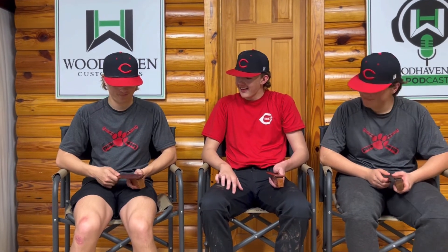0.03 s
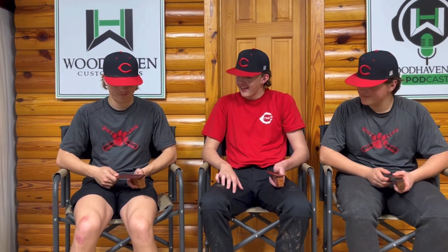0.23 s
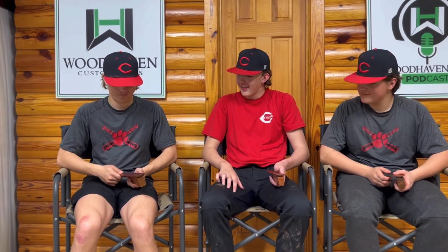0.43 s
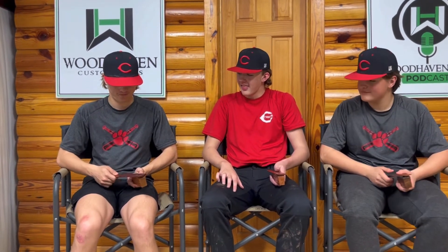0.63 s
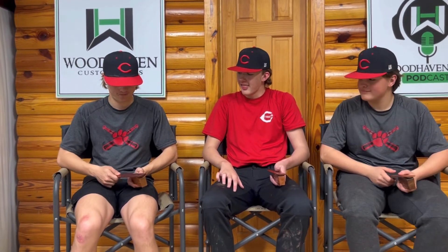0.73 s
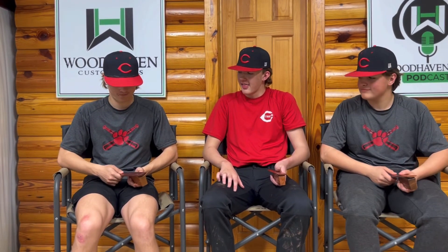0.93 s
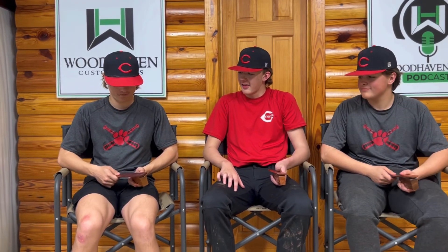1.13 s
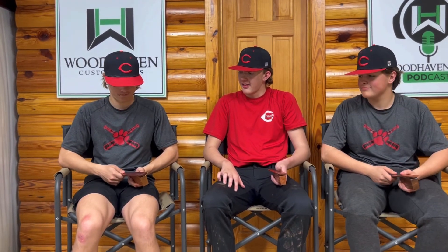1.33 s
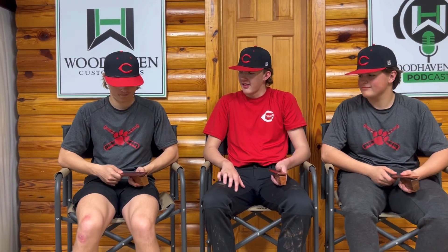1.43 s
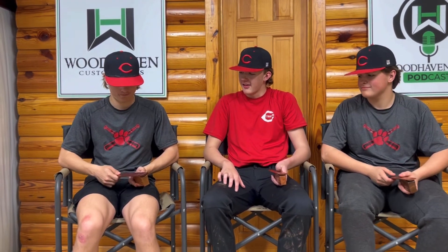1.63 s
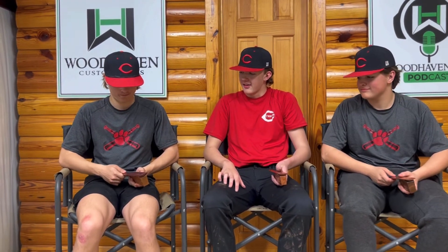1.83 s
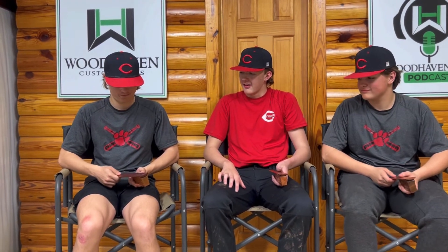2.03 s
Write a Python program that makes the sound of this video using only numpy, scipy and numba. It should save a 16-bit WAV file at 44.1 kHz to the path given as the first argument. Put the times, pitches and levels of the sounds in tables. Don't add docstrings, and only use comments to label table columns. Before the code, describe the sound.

Four nasal, squeaky turkey-like yelps scraped on a wooden box call, over a faint low hum

```python
import sys
import numpy as np
from scipy import signal
from scipy.fft import rfft, irfft, next_fast_len
from scipy.io import wavfile
from scipy.ndimage import uniform_filter1d
from numba import njit

SR = 44100
rng = np.random.default_rng(int(sys.argv[2]) if len(sys.argv) > 2 else 0)


def attenuation_scalar(level_db):
    decades = np.asarray(level_db, float) / 20
    return 10 ** decades


def int16_out(signal):
    q = np.round(np.clip(np.atleast_2d(signal).T, -1, 1) * 32767)
    wavfile.write(sys.argv[1], SR, q.astype(np.int16))


N = 92610

# t/s, twice the slip rate f/Hz, level/dB
STROKES = [
    [(.197, 1543, -37), (.213, 1475, -25), (.257, 1534, -22), (.291, 1551, -20), (.32, 1585, -20.5),
     (.345, 1601, -23), (.375, 1637, -34)],
    [(.637, 1397, -46.5), (.669, 1451, -27), (.697, 1478, -28), (.712, 1546, -25.5), (.75, 1580, -24),
     (.79, 1593, -22), (.82, 1588, -20), (.85, 1612, -25), (.875, 1637, -47.5)],
    [(1.172, 1573, -31), (1.19, 1514, -29), (1.23, 1573, -22), (1.262, 1608, -20), (1.29, 1650, -27),
     (1.315, 1650, -26), (1.335, 1692, -42.5)],
    [(1.597, 1451, -43.5), (1.612, 1433, -32.5), (1.645, 1406, -29), (1.66, 1501, -25), (1.68, 1545, -31.5),
     (1.697, 1580, -24.5), (1.75, 1593, -22.5), (1.79, 1615, -21.5), (1.835, 1650, -31.5)],
]
# t/s, twice the slip rate f/Hz, level/dB
EARLIER_STROKE = [
    (-.3, 1480, -10.5),
    (-.2, 1541, -28.5),
    (-.12, 1593, -25.5),
]
BREAK_TIMES = [
    -.15,
    .323,
    .826,
    1.268,
    1.756,
]
BREAK_STRENGTHS = [
    1.2,
    0.782,
    0.29,
    0.872,
    0.86,
]
# t/s, level over the slips/dB
TOUCHES = [
    (.2, -10),
    (0.659, -8.5),
    (1.175, 4),
    (1.61, -5),
]
# t/s, lowest-tone level/dB, treble tilt above the second overtone/(dB per kHz)
GRIP = [(0, 3, -0.48), (.2, -9.5, 0.05), (.35, 2, 0.07), (.65, 3, -0.77), (.72, 0, 0.2), (.82, 3.5, -0.67),
        (1.2, -0.5, -0.58), (1.3, 2, -0.27), (1.62, 5.5, -0.21), (1.75, 4, 0.24), (1.8, -1.5, -0.67)]
# f/Hz, spread/dB
OVERTONE_WANDER = [(800, 1.5), (1600, 1), (2400, 2), (4000, 5), (8000, 5), (12000, 5)]
# f/Hz, width/Hz, level/dB
BODY_TONES = [(728, 175, -20), (1212, 40, -34.5), (1480, 219, -1.5), (1580, 40.6, 5.5), (1650, 59.3, 0.5),
              (2117, 42, 7), (2347, 85.6, 2.5), (2636, 92.3, 7.5), (3400, 886, -9), (3903, 88, -3),
              (4540, 274, -9.5), (5350, 103, -9), (5890, 410, -13), (7040, 4800, -36.5), (10930, 670, -39),
              (15400, 2200, -47.5)]
# f/Hz, width/Hz
BODY_DIPS = [(1050, 160), (3500, 310)]
# f/Hz, left minus right level/dB
PORT_LEVELS = [(700, 0.5), (1300, 0), (2400, -9), (3300, 4), (4400, 11), (6500, 9), (9000, -0.5),
               (15000, -1)]
# f/Hz, left ahead of right/rad
PORT_PHASES = [(0, 1), (1550, 0.6), (2400, 4), (4000, 4), (5000, 3.5), (6000, 8.5), (8300, 6.5),
               (16000, 20)]
# f/Hz, fade time/s
ROOM_FADE = [(700, 0.13), (1100, 0.45), (1600, 0.33), (2000, 0.59), (2450, 0.34), (4000, 0.45), (7000, 0.6),
             (12000, 0.41)]
# f/Hz, level/dB per Hz
RUMBLE = [(30, -19), (45, -1.5), (69, -2), (113, -5.5), (167, -14.5), (230, -22.5), (450, -35.5),
          (1000, -41.5)]
# f/Hz, level/dB, wander/dB
HUM_TONES = [(93, -60, 1), (139.7, -57.5, 0.93)]
# t/s, level/dB
HUM_LEVEL = [
    (0, -0.5),
    (1.0, -4),
    (1.15, -12.5),
    (2.1, -5),
]
# f/Hz, level/dB
PHONE_TREBLE = [(7000, -0.5), (9400, -1), (11000, 0.5), (12700, -5.5), (14000, -4), (15500, -3.5)]
# f/Hz, share (0-1)
TREBLE_KEPT = [(9000, 1), (9500, .9), (9800, .03), (10500, .03), (11000, .8), (12600, .7), (13000, .06),
               (14400, .03), (14700, .3), (15700, .25)]

LEAD_S = .4
ATTACK_S, RELEASE_S, TOUCH_S = 0.0027, 0.0066, .004
RASP_RISE_S, RASP_FALL_S = 0.0038, 0.052
SMOOTH_JITTER, RASP_JITTER = .0045, .03
SMOOTH_SCATTER_DB, RASP_SCATTER_DB = .4, 2.5
SKIP_UP, SKIP_FALL_S = .14, .008
WOBBLE, RASP_WOBBLE = .004, .022
THROB_DB, THROB_RATE = 5, 110
SCRAPE_DB, RASP_SCRAPE_DB, SCRAPE_GRAIN_DB, SCRAPE_LOWCUT_HZ = -10.5, -33, 2.5, 1500
OVERTONE_HZ, OVERTONE_RATE = 770, 40
CALL_DB, KNOCK_DB, LOWCUT_HZ = 0.5, -32.5, 630
ROOM_DB, ROOM_START_S, ROOM_BUILD_S = -3, 0.0013, 0.0033
RUMBLE_DB, RUMBLE_SIDE_DB, HISS_DB = -59.5, -12, -88
TOP_HZ = 15750
PATCH_BINS, PATCH_FRAMES = 14, 3


def unit(x):
    return x / np.sqrt(np.mean(x ** 2))


def curve(at, table, col=1):
    table = np.array(table, float)
    return np.interp(at, table[:, 0], table[:, col])


def on_log(hz, table):
    table = np.array(table, float)
    return np.interp(np.log(hz + 1), np.log(table[:, 0] + 1), table[:, 1])


def walk(rate, size):
    k = int(SR / rate)
    steps = np.repeat(rng.standard_normal(size // k + 1), k)
    return 1.22 * uniform_filter1d(uniform_filter1d(steps, k), k)[:size]


def fade_after(t, start, fall_s):
    return np.exp(-np.maximum(t - start, 0) / fall_s)


def friction(t):
    hz, gain = np.full(len(t), 750.), np.zeros(len(t))
    for stroke in [EARLIER_STROKE] + list(STROKES):
        start, end = stroke[0][0], stroke[-1][0]
        near = (t > start - .01) & (t < end + .15)
        hz[near] = curve(t[near], stroke) / 2
        shape = np.clip((t - start) / ATTACK_S + .5, 0, 1) * fade_after(t, end, RELEASE_S)
        gain += shape * attenuation_scalar(curve(t, stroke, col=2))

    rasp, skip = 0, 0
    for at, strength in zip(BREAK_TIMES, BREAK_STRENGTHS):
        rise = np.clip((t - at) / RASP_RISE_S + 1, 0, 1)
        rasp = rasp + strength * rise * fade_after(t, at, RASP_FALL_S)
        skip = skip + strength * SKIP_UP * (t > at) * fade_after(t, at, SKIP_FALL_S)
    hz = hz * (1 + skip)
    hz = hz * (1 + (WOBBLE + RASP_WOBBLE * rasp) * walk(THROB_RATE, len(t)))
    throb = np.clip(walk(THROB_RATE, len(t)), -1.5, .6)
    gain = gain * attenuation_scalar((1 + THROB_DB * np.sqrt(rasp)) * throb)

    chance = np.clip(rng.standard_normal((len(t) // 40, 2)), -2.5, 2.5)
    jitter = SMOOTH_JITTER + RASP_JITTER * rasp
    scatter = np.log(attenuation_scalar(SMOOTH_SCATTER_DB + RASP_SCATTER_DB * rasp))
    clicks = slips(hz, jitter, scatter, chance)

    touch = sum(attenuation_scalar(db) * (t > at) * fade_after(t, at, TOUCH_S) for at, db in TOUCHES)
    scrape_gain = attenuation_scalar(SCRAPE_DB) + touch + rasp * attenuation_scalar(RASP_SCRAPE_DB)
    grain = attenuation_scalar(SCRAPE_GRAIN_DB * walk(150, len(t)))
    lowcut = signal.butter(1, SCRAPE_LOWCUT_HZ, "high", fs=SR, output="sos")
    scrape = scrape_gain * grain * signal.sosfilt(lowcut, rng.standard_normal(len(t)))
    return shifting_grip(unit(clicks) + scrape, t), gain


@njit
def slips(hz, jitter, scatter, chance):
    out, phase, k = np.zeros(len(hz) + 16), 0., 0
    for i in range(len(hz)):
        step = hz[i] * (1 + jitter[i] * chance[k, 0]) / SR
        phase += step
        if phase >= 1:
            phase, k = phase - 1, k + 1
            size = np.exp(scatter[i] * chance[k, 1])
            for j in range(16):
                d = j - 8 + phase / step
                out[i + j] += size * np.sinc(.9 * d) * (.5 + .5 * np.cos(np.pi * d / 8.5))
    return out[8:-8]


def shifting_grip(x, t):
    spectrum, hz = rfft(x), np.arange(len(x) // 2 + 1) * SR / len(x)
    out = 0
    for k in range(22):
        share = np.clip(1 - np.abs(hz / OVERTONE_HZ - k), 0, 1)
        db = on_log(k * OVERTONE_HZ, OVERTONE_WANDER) * walk(OVERTONE_RATE, len(x))
        db = db + (k < 2) * curve(t, GRIP)
        db = db + max(k - 2, 0) * OVERTONE_HZ / 1000 * curve(t, GRIP, col=2)
        out = out + attenuation_scalar(db) * irfft(spectrum * share, len(x))
    return out


def body(hz):
    s = 1j * hz
    ringing = 0
    for k, (f, width, db) in enumerate(BODY_TONES):
        sign = (-1) ** k
        ringing = ringing + sign * attenuation_scalar(db) * width * s / (f * f + width * s + s * s)
    for f, width in BODY_DIPS:
        ringing = ringing * (f * f + .25 * width * s + s * s) / (f * f + width * s + s * s)
    return ringing * (s * s / (LOWCUT_HZ ** 2 + LOWCUT_HZ * s + s * s)) ** 2


def room(size):
    t = np.arange(SR) / SR
    hz = np.arange(SR // 2 + 1)
    noise, tail = rfft(rng.standard_normal((2, SR))), 0
    for step in range(24):
        centre = 400 * 2 ** (step / 4)
        band = np.clip(1 - 4 * np.abs(np.log2((hz + 1) / centre)), 0, 1)
        tail = tail + irfft(noise * band, SR) * attenuation_scalar(-60 * t / on_log(centre, ROOM_FADE))
    tail = tail * np.clip((t - ROOM_START_S) / ROOM_BUILD_S, 0, 1)
    return rfft(tail / np.sqrt(np.sum(tail ** 2) / 2), size)


def background():
    t, hz = np.arange(N) / SR, np.arange(N // 2 + 1) * SR / N
    colour = attenuation_scalar(on_log(hz, RUMBLE)) * (hz > 36) * (hz < 1500)
    mid, side = irfft(rfft(rng.standard_normal((2, N))) * colour, N)
    scale = attenuation_scalar(RUMBLE_DB + 1.0 * walk(1.9, N)) / np.std(mid)
    hum = 0
    for f, db, wander in HUM_TONES:
        level = np.sqrt(2) * attenuation_scalar(db + wander * walk(3.914, N) + curve(t, HUM_LEVEL))
        turns = np.cumsum(f * (1 + 0.00964 * walk(2.9, N))) / SR
        hum = hum + level * np.sin(2 * np.pi * turns)
    sides = np.array([[1], [-1]])
    rumble = scale * (mid + sides * attenuation_scalar(RUMBLE_SIDE_DB) * side)
    hiss = attenuation_scalar(HISS_DB) * rng.standard_normal((2, N))
    return rumble + hum * attenuation_scalar(0.97 * sides) + hiss


def scene():
    lead = int(LEAD_S * SR)
    t = (np.arange(N + lead) - lead) / SR
    size = next_fast_len(len(t) + SR)
    hz = np.arange(size // 2 + 1) * SR / size
    rub, gain = friction(t)
    scale = attenuation_scalar(CALL_DB) / np.std(irfft(rfft(rub, size) * body(hz), size)[:len(t)])
    call = rfft(rub * gain * scale, size) * body(hz)
    knock = rfft(gain * rng.standard_normal(len(t)), size) * (hz > 180) / (1 + (hz / 500) ** 4)
    call = call + attenuation_scalar(KNOCK_DB) * knock
    half = np.array([[.5], [-.5]])
    ports = attenuation_scalar(half * on_log(hz, PORT_LEVELS)) * np.exp(1j * half * curve(hz, PORT_PHASES))
    heard = irfft(call * (ports + attenuation_scalar(ROOM_DB) * room(size)), size)
    return heard[:, lead:lead + N] + background()


def low_pass(x):
    return signal.sosfilt(signal.butter(12, 15870, fs=SR, output="sos"), x)


def record(dry):
    hz, _, cells = signal.stft(dry, SR, nperseg=2048, noverlap=1536)
    luck = rng.random((len(hz) // PATCH_BINS + 1, cells.shape[2] // PATCH_FRAMES + 1))
    luck = uniform_filter1d(luck, size=2, axis=1)
    luck = np.where(luck < .5, 2 * luck ** 2, 1 - 2 * (1 - luck) ** 2)
    luck = np.repeat(np.repeat(luck, PATCH_BINS, axis=0), PATCH_FRAMES, axis=1)
    luck = luck[:len(hz), :cells.shape[2]]
    treble = attenuation_scalar(on_log(hz, PHONE_TREBLE)) * (hz < TOP_HZ)
    kept = (luck <= curve(hz, TREBLE_KEPT)[:, None]) * treble[:, None]
    mix = signal.istft(cells * kept, SR, nperseg=2048, noverlap=1536)[1][:, :N]
    return low_pass(mix)


dry = scene()
out = record(dry)
int16_out(out)
```